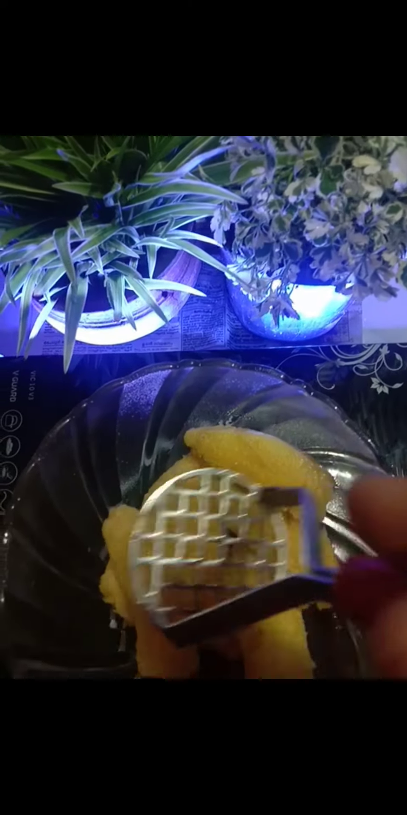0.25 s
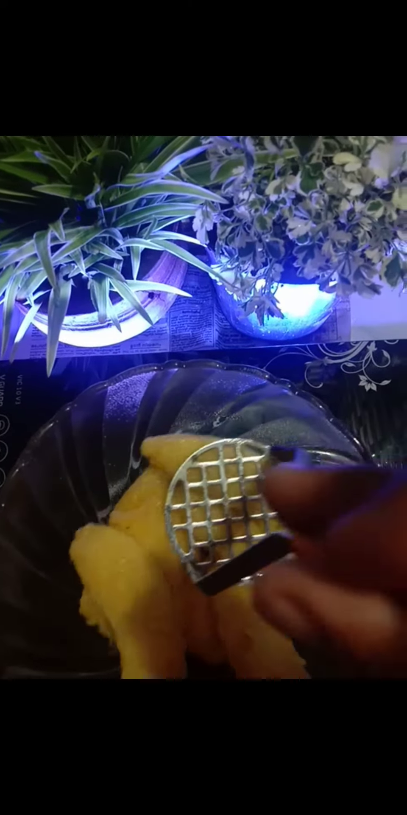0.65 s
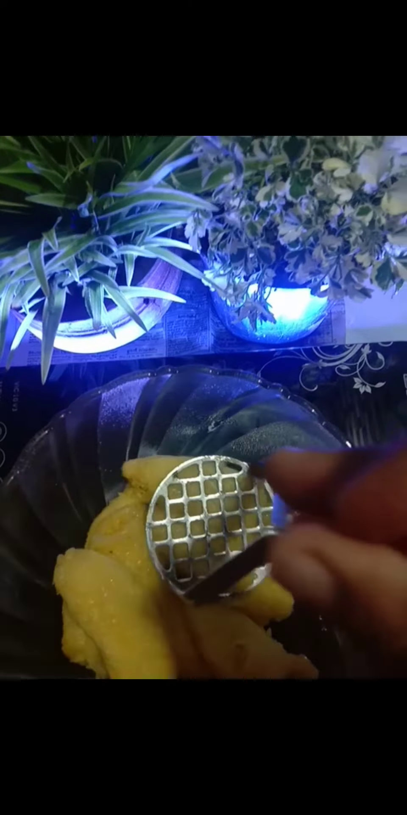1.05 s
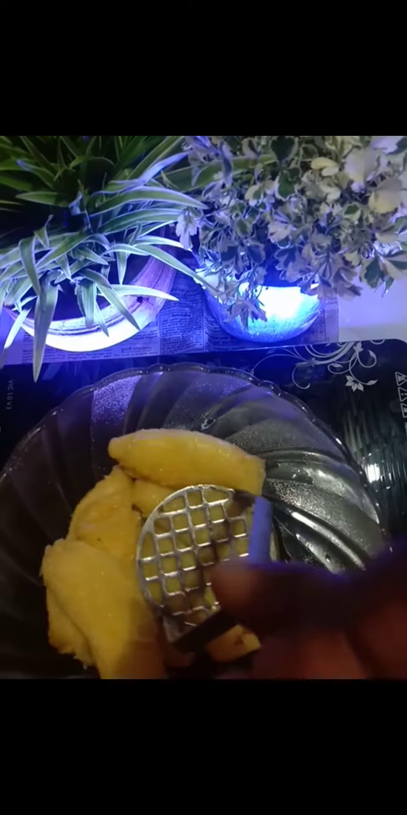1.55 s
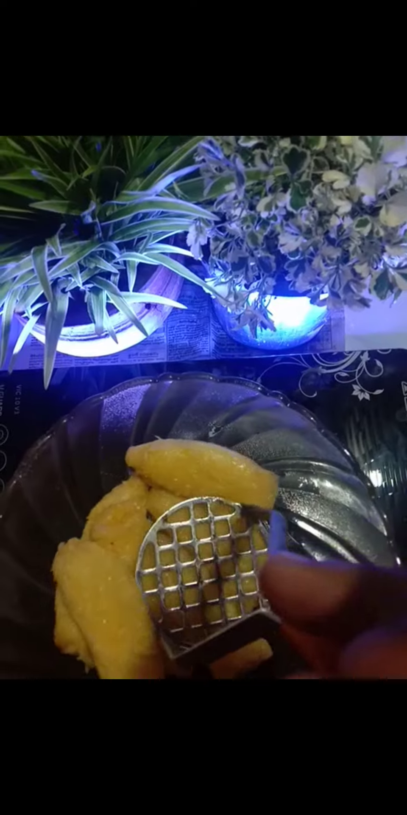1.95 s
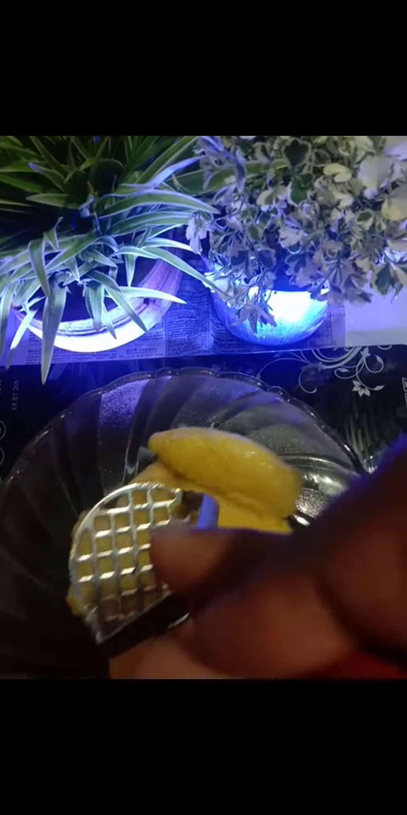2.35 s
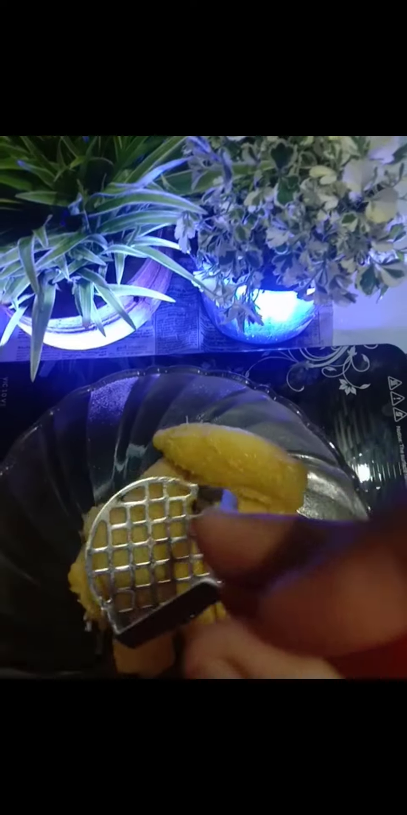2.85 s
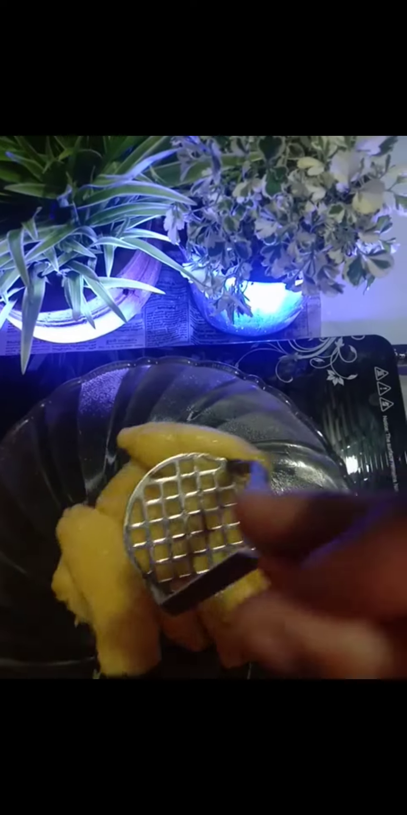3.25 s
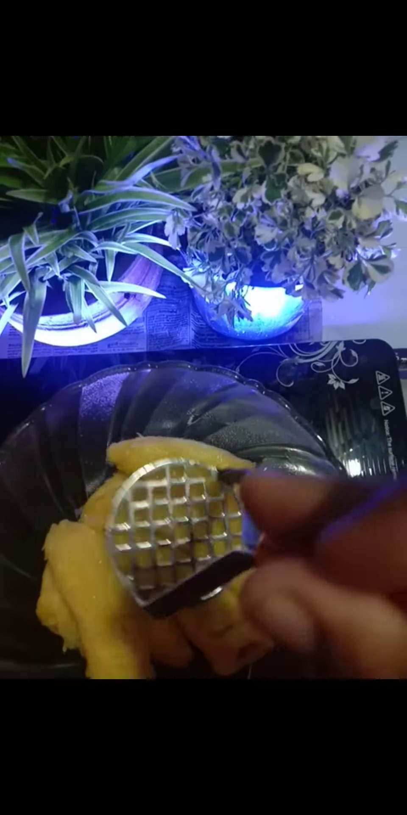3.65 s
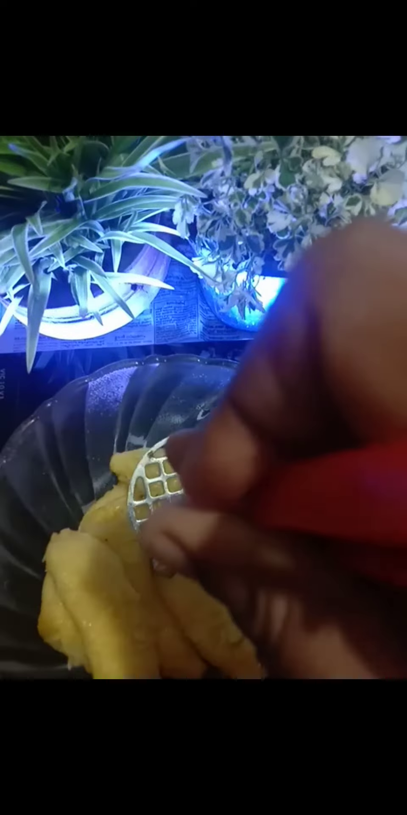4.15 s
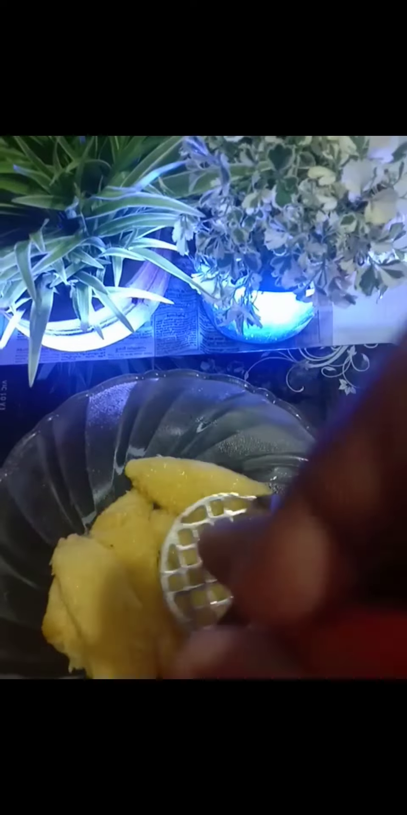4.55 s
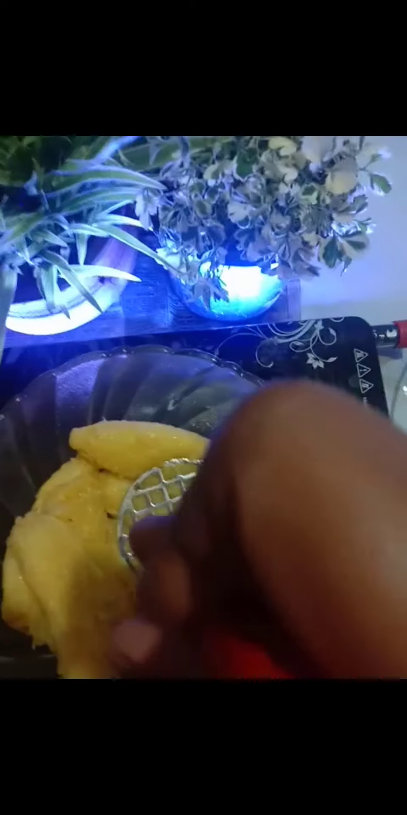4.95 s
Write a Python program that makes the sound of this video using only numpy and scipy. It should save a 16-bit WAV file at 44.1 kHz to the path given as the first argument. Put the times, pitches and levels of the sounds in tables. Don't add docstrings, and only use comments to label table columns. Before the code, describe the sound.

Sticky pops and ticks of air bursting through mashed food, with brief fizzy squeezes, slippery squeaks and soft damped knocks in a hollow glass bowl. A dull thud comes around three seconds as the bowl rocks, then one sharp bright glass clink and, under a second later, a lower, shorter one. Close phone microphone, slight kitchen echo, faint rumble and hiss.

```python
import sys
import numpy as np
from scipy import signal
from scipy.fft import rfft, irfft, next_fast_len
from scipy.io import wavfile
from scipy.ndimage import map_coordinates

SR = 44100
rng = np.random.default_rng(int(sys.argv[2]) if len(sys.argv) > 2 else 0)


def linear_from_db(decibels):
    return 10 ** (np.asarray(decibels, float) / 20)


def inscribe(sig):
    pcm = np.round(np.clip(np.atleast_2d(sig).T, -1, 1) * 32767)
    wavfile.write(sys.argv[1], SR, pcm.astype(np.int16))


N = 228482

# f/Hz, width/Hz, level/dB
HOLLOW = [(878, 87, 4), (1240, 23, 9), (1610, 100, 1.5)]
# f/Hz, width/Hz, level/dB
MASH = [(2230, 90, -1), (3270, 260, -7), (4760, 200, -3), (6250, 220, -6)]
# f/Hz, level/dB
FIZZ = [(1500, -45), (3500, -22), (5000, -16), (6300, -8), (7500, 0), (8700, -7), (10500, -16),
        (13000, -25), (15200, -15), (15900, -45)]
# t/s, crack level/dB, crack t60/s, ring echo/dB, wash/dB
STRIKES = [
    (3.852, -5, 0.013, -11.5, 0.5),
    (4.5547, -14, 0.073, -18, -12),
]


def pops():
    # f/Hz, level/dB
    sparkle_colour = [(7000, -37.5), (9000, -4.5), (10200, -3.5), (11500, -10.5), (13300, -15),
                      (15200, -3.5), (16000, -24.5)]
    out = np.zeros(N)
    t = np.arange(SR // 16) / SR
    for s, db, hz, sparkle_db, smack_db, smack_hz in every_pop():
        grit = rng.standard_normal((3, len(t)))
        ragged = wobble(1200, size=len(t))
        snap = blip(t, hz, swell=0.00043) * (1 + 0.35 * ragged)
        snap /= abs(snap).max()
        snap += 0.13 * ring(t, 7500, t60=0.015, rise=0.001)

        sparkle = coloured(blip(t, 14000, swell=0.0004) * grit[0], sparkle_colour)
        sparkle /= abs(sparkle).max()

        smack = blip(t, smack_hz, swell=0.001) * (0.25 + wobble(2500, size=len(t)))
        smack *= 0.6 / abs(smack).max()
        smack += linear_from_db(-10 - 60 * t / 0.0077) * unit(resonant(grit[0], MASH))

        thread_db = 4 * np.repeat(grit[2], 60)[:len(t)]
        threads = unit(coloured(grit[1] * linear_from_db(thread_db), FIZZ))
        after_db = -19 - 0.035 * (db + 15.5) - 60 * t / 0.04
        after = linear_from_db(after_db) * (1 - np.exp(-t / 0.0002)) * threads

        layers = snap + after + linear_from_db(sparkle_db + 1) * sparkle + linear_from_db(smack_db + 2) * smack
        add(out, s, linear_from_db(db + 1.47) * layers)
    return out


def every_pop():
    # t/s, peak level/dB, sparkle re snap/dB, smack re snap/dB, snap f/Hz
    dry_pops = [(0.0604, -63, -11, -13, 8170.0), (0.073, -34.5, -0.5, -13.5, 7920),
                (0.9778, -26, -12.5, -37, 7350), (0.9895, -56, -20, -13, 7440.0),
                (1.0404, -52, -5, -33, 7800), (1.0481, -29, -14, -27, 7270), (1.0607, -46, -11, -15, 7640),
                (1.5413, -51, -20, -9, 7410.0), (1.6071, -49.5, -26, -10, 7360),
                (1.8292, -50.5, 9.5, -18, 7600), (1.84, -45, -19, -20, 7520.0),
                (1.8505, -27.5, -3, -42, 7600), (1.9283, -47, -14, -22, 8600), (1.949, -25, -13, -31, 7980),
                (1.9598, -39.5, -13, -45, 7500), (2.0524, -48, -11, -18, 8200),
                (2.301, -37.5, -33, -13, 7670), (2.3459, -50, -4, -15, 8170.0),
                (2.359, -42, -10, -26, 8350), (2.507, -49, -12, -20, 8000), (2.5098, -42, -5.5, -17, 7800),
                (2.5184, -48, -20, -12, 7900), (2.811, -48, -1, -13, 8100), (3.2236, -50.5, -10, -11, 7830),
                (3.2618, -50, -27, -14, 8000), (3.5271, -56, -27, -15.5, 7220.0),
                (3.5632, -57, 9, -20, 9000), (3.594, -48.5, 0, -14.5, 7190.0),
                (3.6151, -37, -5, -22.5, 7820), (4.2863, -52.5, -13, -26.5, 7710),
                (4.2973, -35, -2, -20.5, 8100), (4.3062, -56, -14.5, -27, 7410.0),
                (4.3239, -53.5, 2, -25.5, 7680), (4.3519, -51.5, -3, -19, 7945),
                (4.356, -42, -10, -23, 7570), (4.3691, -52, -8, -27, 7740), (4.3742, -50, -1, -25, 7670),
                (4.6337, -59, -18, -25, 7690), (4.6429, -51, -16.5, -26.5, 7570),
                (4.6462, -58, -21.5, -25, 7410.0), (4.7062, -54.0, -10, -28.5, 7400),
                (4.7216, -49.5, -10, -29, 7600)]
    # t/s, peak level/dB, sparkle re snap/dB, smack re snap/dB, smack f/Hz
    wet_pops = [(0.105, -56, 3, -11, 4430.0), (0.6003, -39.5, -2.5, -10, 3240),
                (0.665, -57, -18, -12, 3360.0), (0.6823, -40.5, -36, 5.5, 3960),
                (0.6966, -53, -21, -6, 4730), (0.7152, -60, -17, -4, 3600), (0.7297, -44, -10, -7, 6100),
                (0.995, -40, -11, -14, 6160), (1.008, -54, -8, -8, 5400), (1.0361, -54, -12, -7, 6110.0),
                (1.0664, -54, -7, 9, 6160), (1.0715, -50, -16, 3.5, 3770), (1.373, -45.5, 2, -9, 4500),
                (1.4545, -46, -11, -3.5, 5070), (1.4641, -58.1, -7, 1, 5920.0),
                (1.486, -55, -4, -4, 4090.0), (1.5124, -24, -40, -4, 6070), (1.545, -41.5, -31, -2, 6000),
                (1.557, -51, -24, 0, 3770), (1.5689, -56.3, -14, -2, 5360), (1.8578, -59, -3, -8, 6000),
                (1.9966, -55, -3, -9, 4360.0), (2.217, -55, -10, -9, 5750), (2.3144, -55.3, -22, -14, 4100),
                (2.3341, -55, -3, -11, 5250), (2.371, -54, -22, -9, 5220.0), (2.3807, -46, -15, 4.5, 3700),
                (2.3858, -35, -27, -3, 5940), (2.434, -48.5, -9, -7, 5800), (2.8482, -55, -10, -12, 6000),
                (3.1616, -59, -23, -1, 5840), (3.285, -54, 7.5, -2.5, 5800), (3.425, -56.5, 0, -10, 5770),
                (3.542, -25.5, -6.5, -12.5, 5720), (3.5647, -33.5, -14, -5, 5500),
                (3.581, -48, -4, -6, 5500), (3.5879, -43, -1, -9, 6130.0), (3.599, -46, -20, 0, 3640)]
    # t/s, peak level/dB
    faint_pops = [(.7985, -60), (.8325, -64), (1.446, -55), (1.759, -65), (1.908, -62), (2.398, -61),
                  (2.481, -65), (3.112, -65), (3.124, -58.5), (3.157, -61), (3.294, -56), (3.605, -44),
                  (4.027, -62), (4.763, -66), (4.812, -58.5)]
    usual_snap_hz, usual_smack_hz = 7500, 4540
    rows = []
    for s, db, sparkle_db, smack_db, hz in dry_pops + [(s, db, -9, -10, usual_snap_hz) for s, db in faint_pops]:
        smack_hz = usual_smack_hz * (1 + 0.15 * rng.standard_normal())
        rows.append((s, db, hz, sparkle_db, smack_db, smack_hz))
    for s, db, sparkle_db, smack_db, hz in wet_pops:
        snap_hz = usual_snap_hz * (1 + 0.025 * rng.standard_normal())
        rows.append((s, db, snap_hz, sparkle_db, smack_db, hz))
    return rows


def knocks():
    # t/s, peak level/dB, f/Hz
    knock_rows = [(.071, -66, 1210), (.103, -64, 1130), (0.127, -55, 1270), (0.6, -65, 1040),
                  (0.6016, -51, 2840), (.714, -65, 773), (0.735, -59, 1200), (.979, -50.5, 847),
                  (1.056, -60, 1270), (1.074, -58, 1240), (1.373, -51, 1240), (1.402, -60, 1240),
                  (1.454, -59, 2080), (1.512, -49, 1220), (1.543, -61, 1165), (1.848, -56.5, 1193),
                  (1.948, -65.5, 754), (2.331, -53.5, 1240), (2.383, -53.5, 1294), (2.507, -63.5, 1480),
                  (3.222, -65, 1220), (3.541, -49.5, 1595), (3.564, -54.5, 898)]
    cycles_t60 = 54
    out = np.zeros(N)
    t = np.arange(SR // 5) / SR
    for s, db, hz in knock_rows:
        scrape = unit(resonant(rng.standard_normal(len(t)), HOLLOW + MASH)) * linear_from_db(-60 * t / 0.13)
        tone = ring(t, hz, cycles_t60 / hz, rise=0.00051) * (1 + 0.25 * wobble(150, size=len(t)))
        add(out, s, linear_from_db(db + 2.5) * (tone + 0.3 * scrape))
    return out


def squash():
    squeeze, slide, fizz = stroke_gains()
    bubbles_per_s = 2500
    bursts = rng.random(N) < bubbles_per_s / SR
    bubbles = bursts * linear_from_db(4.1 * rng.exponential(size=N)) * rng.standard_normal(N)
    grains = unit(np.clip(bubbles, -9, 9)) + 0.52 * rng.standard_normal(N)
    spray = unit(coloured(grains, FIZZ))
    clumps = linear_from_db(4 * wobble(35))
    smear = unit(resonant(rng.standard_normal(N) * linear_from_db(3 * wobble(70)), MASH))
    rub = unit(resonant(rng.standard_normal(N) * linear_from_db(3.5 * wobble(45)), HOLLOW))
    return linear_from_db(-9) * fizz * clumps * spray + linear_from_db(-5) * slide * smear + linear_from_db(-1) * squeeze * rub


def stroke_gains():
    # start t/s, length/s, squeeze level/dB, slide level/dB, fizz level/dB
    strokes = [
        (0.056, 0.054, -78.5, -86, -60.5),
        (0.722, 0.09, -68.5, -69.5, -68),
        (1.053, 0.023, -77, -74, -81),
        (1.368, 0.15, -74.5, -71, -66.5),
        (1.776, 0.11, -72.5, -83, -73),
        (2.322, 0.088, -69, -68, -61),
        (2.788, 0.074, -75, -72, -70),
        (3.219, 0.21, -71.5, -82, -72.5),
        (3.511, 0.1, -73.5, -84, -60.5),
        (4.296, 0.059, -65, -68, -62),
    ]
    push_db_per_s, relax_db_per_s, fizz_slope_ratio = 300, 110, 9
    start, length, squeeze_db, slide_db, fizz_db = np.transpose(strokes)[..., None]
    now = np.arange(N) / SR
    before_s = np.clip(start - now, 0, None)
    after_s = np.clip(now - start - length, 0, None)
    off_db = push_db_per_s * before_s + relax_db_per_s * after_s
    levels_db = (squeeze_db - off_db, slide_db - off_db, fizz_db - fizz_slope_ratio * off_db)
    return [linear_from_db(db).sum(axis=0) for db in levels_db]


def squeaks():
    squeak_rows = [(.69, .18, 4840, -80), (.73, 0.036, 6350, -72), (0.782, 0.11, 2170, -77),
                   (1.07, 0.028, 2180, -68), (1.547, 0.033, 2850, -67.5), (2.333, 0.052, 1250, -63),
                   (2.798, 0.059, 4760, -75.5), (2.815, 0.054, 6050, -75), (2.855, 0.075, 2260, -74.5),
                   (3.589, 0.057, 2280, -68.5), (3.157, 0.19, 1203, -68)]
    out = np.zeros(N)
    for s, length, hz, db in squeak_rows:
        t = np.arange(round(length * SR)) / SR
        phase = 2 * np.pi * hz * t + 2.2 * wobble(150, size=len(t))
        slip = np.sin(phase) * linear_from_db(4 * wobble(120, size=len(t)))
        add(out, s, linear_from_db(db) * np.abs(np.sin(np.pi * t / length)) ** 0.5 * slip)
    return out


def peels():
    peel_rows = [(0.599, .02, -59, 7000, 11000), (0.689, 0.024, -61, 3040, 7540),
                 (0.977, 0.052, -61.5, 3020, 7050), (1.054, 0.043, -65, 5500, 8500),
                 (1.445, 0.038, -60, 1500, 8500), (1.514, 0.045, -61, 3980, 8400),
                 (1.857, 0.035, -59.5, 5500, 10200), (1.953, 0.043, -58.5, 5600, 10000),
                 (2.39, 0.03, -66, 4000, 9000), (2.514, 0.044, -65.5, 2980, 5430),
                 (2.81, .03, -64, 13500, 15800), (3.23, .09, -72.5, 890, 3500),
                 (3.361, 0.071, -70.5, 400, 2450), (3.543, 0.087, -56, 4900, 7100)]
    out = np.zeros(N)
    t = np.arange(4096) / SR
    for s, length, db, low_hz, high_hz in peel_rows:
        grain = rng.standard_normal(len(t)) * linear_from_db(4 * wobble(600, size=len(t)))
        band = unit(filtered(grain, lambda f: 1 / (1 + (low_hz / (f + 1)) ** 8) / (1 + (f / high_hz) ** 8)))
        add(out, s, linear_from_db(db) * np.clip(1 - t / length, 0, 1) * band)
    return out


def glass():
    return filtered(beating_modes() + blows(), lambda f: (1j * f / (1j * f + 70)) ** 2)


def beating_modes():
    # f/Hz (minus: far side of a node line), level/dB, t60/s
    rim_groups = [(765.2, -45, .95), (-765.3, -22.3, .07), (777.7, -20, .31), (-1752.9, -28.3, .43),
                  (-1764.3, -24.9, .55), (-1771.7, -26, .86), (-1787.6, -20.5, .53), (1788, -13.4, .23),
                  (-1803.5, -42.7, 1.), (3024.5, -25.1, .53), (-3028.9, -19.1, .34), (-3040.1, -21.2, .57),
                  (3043.6, -18.2, .38), (3079, -39, .3), (3050, -55, 2.), (-4492.3, -43.3, .45),
                  (4499.3, -45.5, .68), (-4504.2, -39, .32), (4510.8, -42.8, .45), (4513.9, -45.5, .64),
                  (4526, -38, .72), (-4548.8, -31.3, .28), (6210.8, -60.7, 1.1), (6225.1, -39.4, .3),
                  (6234.2, -30.5, .14), (6257.4, -55.2, .4), (-8134.2, -38, .35), (8137.5, -30.3, .12),
                  (8149.2, -47.9, .31)]
    # f/Hz (minus: far side of a node line), level/dB, t60/s
    floor_groups = [(-772.9, -64.6, 1.2), (785.1, -23.3, .19), (794.4, -46, .75), (1737.6, -37.2, .08),
                    (1768.9, -50, .32), (-1778.2, -58, 1.1), (3025.4, -59, 1.15), (3034.5, -44, .46),
                    (-3041.7, -26.3, .38), (4503.1, -53.6, .37), (-4511.9, -54.2, .54),
                    (4512.1, -28.8, .09), (4546.9, -30.1, .05)]
    out = np.zeros(N)
    t = np.arange(SR) / SR
    for (s, *_), groups in zip(STRIKES, (rim_groups, floor_groups)):
        beating = np.zeros(SR)
        for hz, db, t60 in groups:
            scatter = 1 + 0.7 * np.clip(t * abs(hz) / 1000, 0, 1) ** 1.5 * wobble(170, size=SR)
            beating += linear_from_db(db + 2) * scatter * ring(t, hz, t60, rise=0.002)
        add(out, s, beating)
        add(out, s, linear_from_db(-28) * room(beating))
    return out


def blows():
    mode_hz = [336, 366, 500, 1010, 1310, 1452, 3795, 5880, 6229, 7420, 9130, 9950, 10332, 10970]
    # rim level/dB, rim t60/s, floor level/dB, floor t60/s
    mode_rings = [(-35, .25, -24, .14), (-38, .3, -34, .3), (-37, .15, -32, .12), (-32, .14, -37, .12),
                  (-23, .1, -41, .08), (-29, .18, -43, .1), (-34, .12, -28, .045), (-65, .2, -40, .17),
                  (-70, .4, -33, .11), (-45, .35, -25, .07), (-38, .1, -62, .08), (-41, .16, -60, .08),
                  (-41, .22, -54, .1), (-48, .17, -60, .08)]
    # f/Hz, level/dB, t60/s
    grid_modes = [(1148, -29.5, 0.076), (990, -49, 0.44), (1270, -35, 0.14), (1500, -34, 0.28),
                  (2330, -23.5, 0.047), (4600, -39, 0.1), (8600, -51, 0.26), (11700, -59.5, .12),
                  (12180, -54, .13), (12750, -58, .12), (14200, -48, .05), (15280, -54.5, .1)]
    # f/Hz, level/dB
    rim_crack = [(20, -69), (60, -49), (150, -45), (340, -17), (600, -17.5), (1000, -18.5), (1400, -5.5),
                 (2300, -16), (2800, -19), (5000, -40), (9000, -24.5), (13000, -44.5), (15500, -59)]
    # f/Hz, level/dB
    floor_crack = [(30, -64.5), (130, 3.5), (350, 2.5), (800, -7.5), (1500, 1.5), (2500, -25.5),
                   (4500, -24.5), (7400, -7.5), (9000, -24), (11000, -28), (13500, -44), (15200, -30)]
    # f/Hz, density/(dB per Hz)
    rim_wash = [(50, -52.5), (150, -21), (340, -4.5), (600, -13), (1000, -8), (1500, -6.5), (2300, -15),
                (2800, -19), (5200, -25.5), (7500, -24), (11000, -35), (13500, -50.5), (15300, -41.5),
                (16000, -74.5)]
    # f/Hz, density/(dB per Hz)
    floor_wash = [(40, -36.5), (130, 11), (220, -6.5), (350, 0.5), (600, -12), (900, -1.5), (1600, -10),
                  (2600, -18), (5200, -17), (7400, -18), (11000, -54), (13500, -61), (15300, -35.5),
                  (16000, -75.5)]
    second_blow_db = -16
    out = np.zeros(N)
    t = np.arange(SR) / SR
    colours = zip(STRIKES, (rim_crack, floor_crack), (rim_wash, floor_wash))
    for k, ((s, crack_db, crack_t60, echo_db, wash_db), colour, wash) in enumerate(colours):
        bell = np.zeros(SR)
        for hz, row in zip(mode_hz, mode_rings):
            db, t60 = row[2 * k:2 * k + 2]
            flutter = 1 + np.clip(t * hz / 1200, 0, 1) ** 2 * wobble(110, size=SR)
            bell += linear_from_db(db) * flutter * ring(t, hz, t60, rise=0.00012)
        for hz, db, t60 in grid_modes:
            gain = linear_from_db(db + k * second_blow_db + rng.normal(0, 1.5))
            bell += gain * (1 + 0.6 * wobble(70, size=SR)) * ring(t, hz, t60, rise=0.0005)
        impact = rng.standard_normal(SR) - 9 * (t == 0)
        crack = coloured(linear_from_db(-60 * t / crack_t60) * impact, colour)
        add(out, s, bell + linear_from_db(crack_db) * crack / abs(crack).max())
        add(out, s, linear_from_db(echo_db) * room(bell))
        wash_source = unit(coloured(t == 0, wash)[:4096]) / 64
        add(out, s, linear_from_db(wash_db) * room(wash_source))
    return out


def glass_hum():
    hum_row = (1.2, 1.37, 786, -76)
    start, end, hz, db = hum_row
    now = np.arange(N) / SR
    rubbing = np.clip(np.minimum((now - start) / 0.0043, (end - now) / 0.015), 0, 1)
    return linear_from_db(db + 3 * wobble(24)) * rubbing * np.sin(2 * np.pi * hz * now)


def thud():
    # t/s, peak level/dB, f/Hz
    thud_row = (3.071, -36, 584)
    s, db, hz = thud_row
    out = np.zeros(N)
    t = np.arange(SR // 4) / SR
    push = linear_from_db(db) * blip(t, hz, swell=0.0009)
    table = linear_from_db(db - 16.5) * ring(t, 125, t60=0.13, rise=0.0042)
    add(out, s, push + table)
    return out + linear_from_db(-14.5) * room(out)[:N]


def room(x):
    # f/Hz, t60/s
    kitchen_t60 = [(100, 0.75), (500, 0.65), (2000, 0.79), (8000, 0.3), (16000, 0.43)]
    hz, t, z = signal.stft(rng.standard_normal(SR), SR, nperseg=256)
    decay = linear_from_db(-60 * t / along(kitchen_t60, hz)[:, None])
    tail = signal.istft(z * decay, SR, nperseg=256)[1]
    return signal.fftconvolve(np.pad(x, (200, 0)), tail / np.linalg.norm(tail))


def hush():
    # f/Hz, density/(dB per Hz)
    rumble_colour = [(15, -82.5), (25, -26), (97, 0.5), (197, -7), (226, -12.5), (291, -12), (700, -21.5),
                     (910, -55.5), (1540, -120)]
    # t/s, level/dB
    rumble_level = [(0, -69.5), (2.7, -69.5), (3.2, -67.5), (3.6, -68.5), (5.18, -69)]
    # f/Hz, density/(dB per Hz)
    hiss_colour = [(200, -10), (600, 2), (1050, -2), (1240, 6), (1430, -4), (3400, -4), (6300, -10),
                   (7500, -7), (9000, -14), (13500, -17), (15200, -11), (15900, -40)]
    rumble = unit(filtered(rng.standard_normal(N), lambda hz: linear_from_db(along(rumble_colour, hz))))
    hiss = unit(filtered(rng.standard_normal(N), lambda hz: linear_from_db(along(hiss_colour, hz))))
    rumble_db = curves(rumble_level)[0] + 0.5 + 1.4 * wobble(7.5)
    return linear_from_db(rumble_db) * rumble + linear_from_db(-75.5) * hiss


def blip(t, hz, swell):
    return (t / swell * np.exp(1 - t / swell)) ** 2 * np.sin(2 * np.pi * hz * t)


def ring(t, hz, t60, rise):
    return linear_from_db(-60 * t / t60) * (1 - np.exp(-t / rise)) * np.sin(2 * np.pi * hz * t)


def wobble(rate, size=N):
    knots = rng.standard_normal(int(size * rate / SR) + 4)
    return map_coordinates(knots, [np.arange(size) * rate / SR])


def resonant(x, modes):
    def response(f):
        total = 0
        for k, (c, w, db) in enumerate(modes):
            total = total + (-1) ** k * linear_from_db(db) * 1j * f * w / (c * c - f * f + 1j * f * w)
        return total
    return filtered(x, response)


def coloured(x, points):
    cep = irfft(np.log(linear_from_db(along(points, np.fft.rfftfreq(4096, 1 / SR)))))
    cep[1:2048] *= 2
    cep[2049:] = 0
    return signal.fftconvolve(x, irfft(np.exp(rfft(cep))))[:len(x)]


def filtered(x, response):
    m = next_fast_len(len(x) + 8192)
    return irfft(rfft(x, m) * response(np.fft.rfftfreq(m, 1 / SR)), m)[:len(x)]


def along(points, hz):
    f, v = np.transpose(points)
    return np.interp(np.log(hz + 1), np.log(f + 1), v)


def curves(rows):
    s, *cols = np.transpose(rows)
    return [np.interp(np.arange(N) / SR, s, c) for c in cols]


def unit(x):
    return x / np.sqrt(np.mean(x ** 2) + 1e-20)


def add(track, s, sound):
    at = round(s * SR)
    track[at:at + len(sound)] += sound[:len(track) - at]


def scene():
    near = pops() + knocks() + squash() + squeaks() + peels()
    food = near + linear_from_db(-21) * room(near)[:N]
    return (food + glass() + glass_hum() + thud() + hush())[None]


def top_cut(x):
    return signal.sosfilt(signal.butter(12, 16630, fs=SR, output="sos"), x)


def record(dry):
    kept = filtered(dry[0], lambda hz: 1 / (1 + (hz / 16300) ** 40))[None]
    return top_cut(kept)


dry = scene()
out = record(dry)
inscribe(out)
```